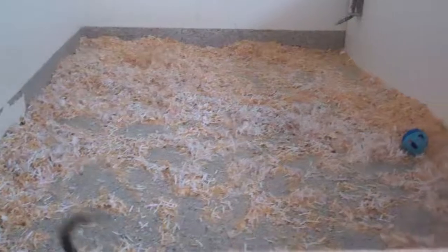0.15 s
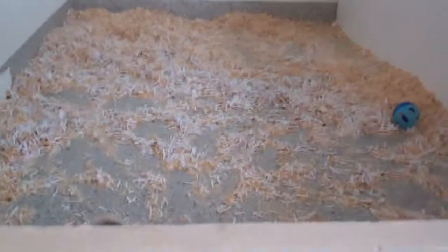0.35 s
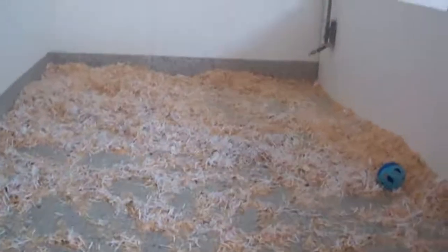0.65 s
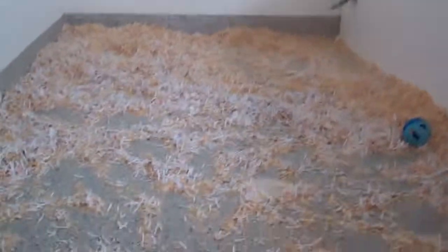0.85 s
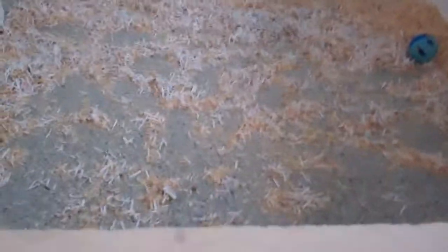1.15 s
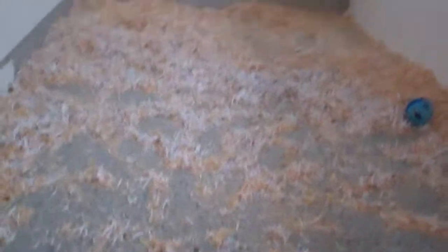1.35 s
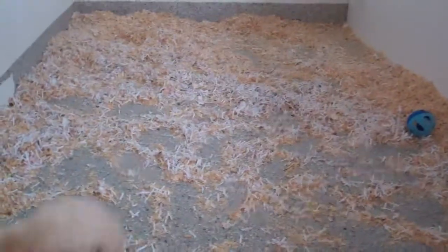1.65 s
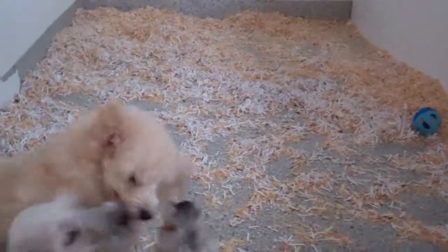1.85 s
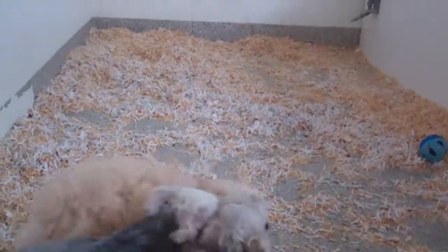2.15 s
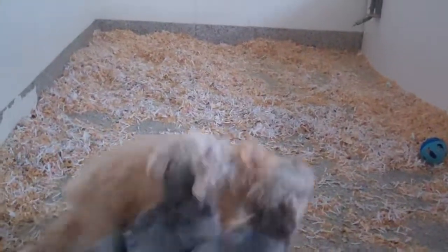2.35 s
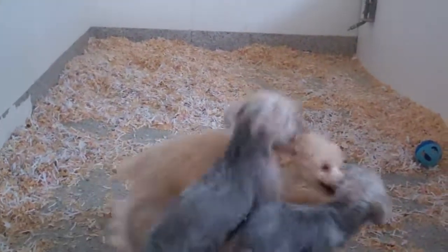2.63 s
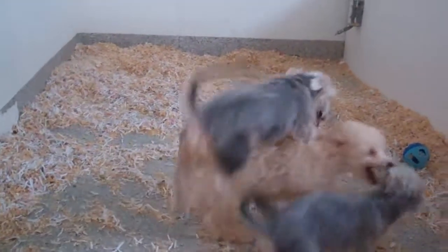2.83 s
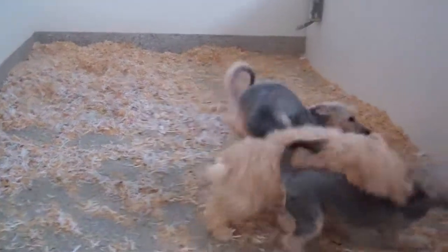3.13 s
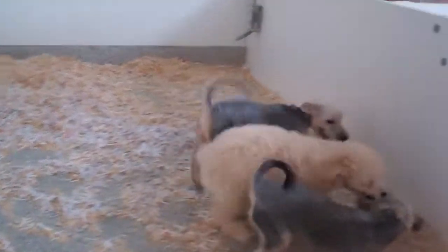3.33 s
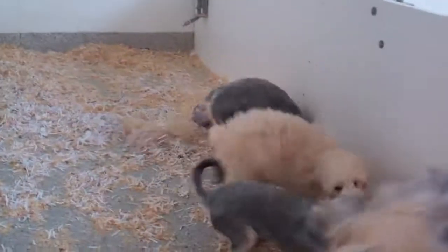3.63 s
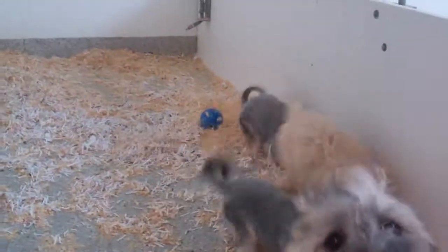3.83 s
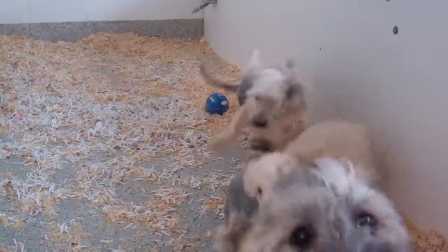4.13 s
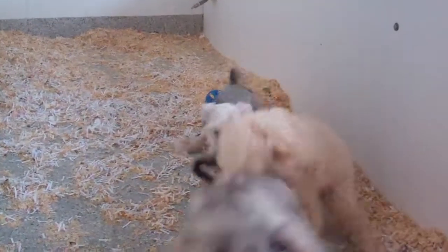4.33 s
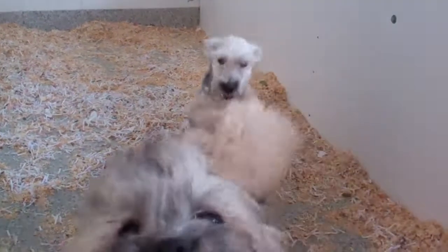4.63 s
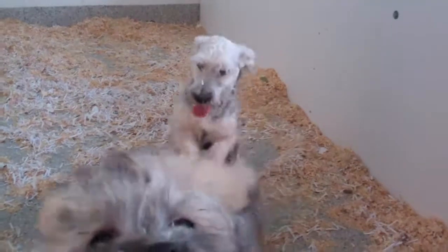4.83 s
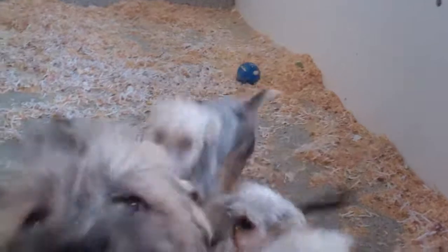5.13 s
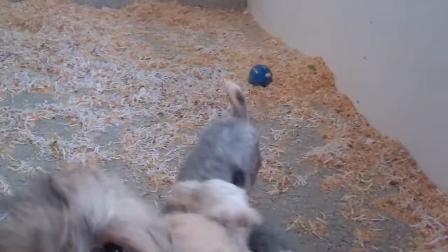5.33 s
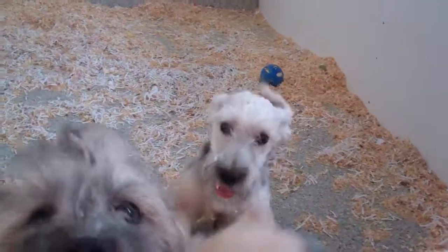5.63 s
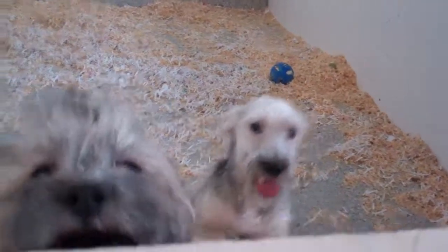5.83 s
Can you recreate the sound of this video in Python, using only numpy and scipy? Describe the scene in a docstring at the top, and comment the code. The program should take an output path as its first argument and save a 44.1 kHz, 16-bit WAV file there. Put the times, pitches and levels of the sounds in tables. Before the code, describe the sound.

In a hard-walled kennel room, puppies play-fight close to the microphone. Soft whimpers, hoarse barks and sharp yelps come first, then a thin trembling whine around two seconds sags into a yap. A piercing double yelp follows, with a bright ring. Later, regularly spaced lower gruff barks mix with small squeaks. Shredded paper rustles throughout, with claw clicks and soft paw thumps.

```python
"""A hard-walled kennel room: puppies play-fight in a pen of shredded paper and shavings, close to a camera.
They yelp, whimper and whine: gliding harmonics of the vocal folds, shaped by the mouth.
Paws and bodies stir the bedding (coloured snaps and hiss), claws scratch and a tooth clicks (ringing noise
bursts); paws land softly and two low puffs of air meet the microphone (damped low notes with noise).
Hoarse barks, and one bright ring of the room after a yelp (pulses and air through resonances), sound
from the room behind, whose echo is decaying noise with tones of its own."""
import sys
import numpy as np
from scipy import signal
from scipy.fft import rfft, irfft, next_fast_len
from scipy.io import wavfile
from scipy.ndimage import uniform_filter1d, map_coordinates

SR = 44100
rng = np.random.default_rng(int(sys.argv[2]) if len(sys.argv) > 2 else 0)


def materialize(psi):
    """Save the field psi as 16-bit PCM at rate SR to the path in sys.argv[1].

    A 1-D psi becomes a single channel; in a 2-D psi each row is a channel.
    """
    bounded = np.clip(np.atleast_2d(psi).T, -1, 1)
    quanta = np.round(bounded * 32767).astype(np.int16)
    wavfile.write(sys.argv[1], SR, quanta)


N = 263718
TIME = np.arange(N) / SR  # s
TOP_HZ = 14400  # upper band limit


def amp(db):
    """Decibels to gain."""
    return 10 ** (np.asarray(db) / 20)


def unit(x):
    """Scale to rms 1."""
    return x / np.sqrt(np.mean(x ** 2) + 1e-20)


def along(points, hz):
    """Read (Hz, value) points on a log axis."""
    f, v = np.transpose(points)
    return np.interp(np.log(hz + 1), np.log(f), v)


def curves(rows, t=TIME):
    """Each column after the first, read at times t."""
    s, *cols = np.transpose(rows)
    return [np.interp(t, s, c) for c in cols]


def wobble(rate, size):
    """A smooth random curve with rate knots a second."""
    knots = rng.standard_normal(int(size * rate / SR) + 4)
    return map_coordinates(knots, [np.arange(size) * rate / SR])


def filtered(x, response):
    """x times a response of frequency."""
    size = x.shape[-1]
    m = next_fast_len(size + 8192)
    return irfft(rfft(x, m) * response(np.fft.rfftfreq(m, 1 / SR)), m)[..., :size]


def resonances(modes, hz):
    """Response of (Hz, nominal width Hz, dB) resonances added together."""
    return sum(amp(db) / (1 + ((hz - centre) / (0.82 * width)) ** 2) for centre, width, db in modes)


def add(track, s, sound):
    """Mix a sound into a track at time s."""
    part = track[..., max(0, round(s * SR)):][..., :sound.shape[-1]]
    part += sound[..., :part.shape[-1]]


def gate(t, start, end, edge):
    """One between start and end, with soft edges."""
    return np.clip((t - start) / edge + .5, 0, 1) * np.clip((end - t) / edge + .5, 0, 1)


def diffuse(pair, spectrum):
    """Two unrelated signals become coloured left and right, alike in the bass."""
    # likeness of left and right in diffuse sound: f/Hz, correlation (0-1)
    likeness = [(100, 1), (600, 0.94), (1400, 0.64), (3000, 0.17), (8000, 0.02)]

    def mid_side(hz):
        turn = np.arccos(np.clip(along(likeness, hz), -1, 1)) / 2
        return amp(along(spectrum, hz)) * np.array([np.cos(turn), np.sin(turn)])

    mid, side = filtered(pair, mid_side)
    return unit(np.array([mid + side, mid - side]))


def folds(pitch, rough, slope_db, count):
    """Harmonics of the vocal folds, coloured by the mouth; roughness shakes their rate and strength."""
    # mouth of a yelping puppy: f/Hz, gain/dB
    mouth = [(700, -2.5), (1500, 0.5), (2700, 3), (3300, 5.5), (4150, 12.5), (5500, -0.5), (7500, -18),
             (11000, -20), (15000, -23)]
    size = len(pitch)
    pitch = pitch * (1 + 0.085 * rough * wobble(698, size))
    k = np.arange(1, count + 1)[:, None]
    gains = amp(slope_db * np.log2(k) + along(mouth, k * pitch)) * (k * pitch < TOP_HZ)
    phase = 2 * np.pi * k * np.cumsum(pitch) / SR
    tone = np.sum(gains * np.sin(phase), axis=0)
    return unit(tone * amp(7 * rough * wobble(600, size)))


def cries(table, attack_cycles, sag_db, release_s):
    """Short cries: pitch glides to a turn and a last note; the voice builds up, sags or holds, and shuts."""
    out = np.zeros(N)
    for s, length, first_hz, turn_hz, last_hz, turn, lateness, db, slope_db, rough in table:
        t = np.arange(int(length * SR)) / SR
        u, turn = t / length, np.clip(turn, .05, .95)
        to_turn = first_hz + (turn_hz - first_hz) * (u / turn) ** lateness
        to_last = turn_hz + (last_hz - turn_hz) * ((u - turn) / (1 - turn)) ** 2
        pitch = np.where(u < turn, to_turn, to_last)
        build_up = np.clip(t * first_hz / attack_cycles, 0, 1)
        shutting = np.clip((length - t) / release_s, 0, 1)
        envelope = build_up * amp(db - sag_db * u) * shutting
        add(out, s, envelope * folds(pitch, rough, slope_db, count=7))
    return out


def yelps():
    """Near yelps: the folds start within a few cycles, burst out and weaken."""
    # t/s, length/s, first f/Hz, f at the turn/Hz, last f/Hz, place of the turn (0-1, kept to .05-.95),
    # lateness of the glide to the turn (1 = even), level before the sag/dB,
    # overtone slope before the mouth/(dB/octave), roughness (0-1)
    yelp_rows = [ (1.204, 0.04, 1552, 2646, 1920, 0.87, 2.3, -9.5, -16.5, 0.08),
                 (1.526, 0.073, 2195, 2904, 2750, 0.57, 2.04, -12, -6, 0.14),
                 (1.774, 0.032, 1945, 2150, 1830, 0.31, 1.1, -20, -9, 0.17),
                 (1.812, 0.038, 1537, 1807, 1900, 0.83, 2.3, -6, -14.5, 0.042),
                 (1.846, .019, 2390, 2640, 2170, 0.49, 0.92, -8, -12, 0.074),
                 (3.395, 0.017, 2470, 2635, 2770, .5, 1.03, -6.5, -28, 0.085),
                 (3.409, .056, 2290, 2770, 2740, .76, 1.02, -6.5, -4.5, 0.11),
                 (4.004, 0.0399, 640, 778, 900, 0.51, 0.58, -10.5, -7, 0.21),
                 (4.707, 0.013, 924, 816, 735, 0.37, 1, -17, -13, 0.29),
                 (4.897, 0.038, 1398, 2136, 1580, 0.54, 0.64, -9, -11.5, 0.034),
                 (5.216, 0.013, 1650, 1400, 1170, .35, 1.2, -11.5, -20, .1),
                 (5.461, .054, 1287, 2290, 1850, .7, 0.76, -15, -15.5, 0.08), ]
    return cries(yelp_rows, attack_cycles=5.5, sag_db=3.5, release_s=0.0071)


def whimpers():
    """Whimpers from further off: the folds take many cycles to swell softly, then hold."""
    # t/s, length/s, first f/Hz, f at the turn/Hz, last f/Hz, place of the turn (0-1),
    # lateness of the glide to the turn (1 = even), level before the mix/dB,
    # overtone slope before the mouth/(dB/octave), roughness (0-1)
    whimper_rows = [ (.092, .064, 1356, 1384, 1290, .47, 1, -13, -7, 0.48),
                    (.398, 0.0438, 1200, 1376, 1350, 0.56, 1, -23, -14, 0.43),
                    (.432, 0.035, 1210, 1307, 1440, 0.495, 0.91, -10.5, -8, 0.43),
                    (.458, 0.044, 1534, 1762, 1810, 0.48, 1.02, -19.5, -7, 0.22),
                    (.506, .052, 1335, 1244, 1214, 0.34, 1, -15, -28, 0.31),
                    (.770, 0.035, 1191, 1333, 1470, 0.52, 0.95, -23.5, -11, 0.26),
                    (.795, 0.096, 807.5, 1290, 1244, 0.77, 1.8, -20.5, -3.5, 0.46),
                    (1.342, 0.058, 1220, 1522, 1260, 0.21, 1, -30, -15, 0.51),
                    (1.385, 0.07, 1103, 1074, 1160, 0.68, 2.2, -24.5, .5, 0.43),
                    (1.668, 0.046, 1288, 1346, 1520, 0.48, 1, -25.5, -11, 0.18),
                    (1.722, 0.042, 1587, 1680, 1630, .7, 1, -26.5, -13, .14),
                    (2.55, .12, 1147, 1000, 878, .3, 0.98, -26.5, -2, 0.3),
                    (2.908, .042, 1277, 1427, 1465, .55, 1.08, -23, -13, 0.33),
                    (2.925, 0.12, 795, 817.6, 824, 0.27, 1.08, -23.5, -0.5, 0.2),
                    (2.97, 0.084, 1648, 2098, 2020, 0.89, 2.06, -19.5, -16.5, 0.48),
                    (3.05, 0.032, 1345, 1420, 1445, 0.54, 1.1, -21, -25, 0.18),
                    (3.175, 0.057, 1800, 1923, 1905, 0.63, 0.92, -29.5, -22, 0.24),
                    (3.325, 0.047, 1510, 1310, 1305, 0.45, 1.06, -31.5, -22, .12), ]
    # a negative sag: the level rises slightly
    far = cries(whimper_rows, attack_cycles=17.8, sag_db=-0.5, release_s=0.011)
    # turned away, these lose their highest overtones
    return filtered(far, lambda hz: 1 / (1 + (hz / 6200) ** 10))


def whine():
    """A long thin whine: trembling harmonics with a strong third, ending as a rough yap that sags in pitch."""
    # steady voice: t/s, f before scoop and tremble/Hz, fundamental level/dB, level shared by the overtones/dB
    whine_rows = [(2.01, 1353, -24.5, -28), (2.034, 1420, -16.5, -34), (2.06, 1462, -25, -33),
                  (2.086, 1355, -20, -31), (2.19, 1410, -16, -30), (2.228, 1340, -26, -24.5),
                  (2.256, 1423, -15.5, -33), (2.378, 1357, -20.5, -28), (2.422, 1380, -29, -30),
                  (2.446, 1357, -20, -24), (2.468, 1346, -29.5, -35), (2.532, 1338, -25, -27.5),
                  (2.56, 1355, -24.5, -34)]
    # upper voice sagging into the yap: t/s, f/Hz, level/dB
    slide_rows = [(2.52, 2695, -47), (2.545, 2350, -26), (2.572, 1980, -25.5), (2.609, 1905, -30.5),
                  (2.661, 1800, -13.5), (2.692, 1860, -23)]
    pitch, first_db, overtone_db = curves(whine_rows)
    start, end = whine_rows[0][0], whine_rows[-1][0]
    # the voice slides up to its note
    scoop, scoop_s = 0.069, 0.0148  # share of the pitch, time constant
    pitch = pitch * (1 - scoop * np.exp(-np.maximum(TIME - start, 0) / scoop_s))
    tremble = 1 + 0.0063 * wobble(60, N) + 0.0063 * wobble(500, N)
    phase = 2 * np.pi * np.cumsum(pitch * tremble) / SR
    tone = amp(first_db) * np.sin(phase)
    for k, db in [(2, -9.5), (3, 7.5), (4, -11.5)]:  # harmonic, dB on the shared level
        tone += amp(overtone_db + db + 4.2 * wobble(54.93, N)) * np.sin(k * phase)
    out = np.sqrt(2) * tone * amp(3.06 * wobble(70, N)) * gate(TIME, start, end, edge=0.045)

    t = np.arange(slide_rows[0][0], slide_rows[-1][0], 1 / SR)
    slide_hz, slide_db = curves(slide_rows, t)
    yap = folds(slide_hz, rough=0.45, slope_db=-11, count=7)
    add(out, t[0], amp(slide_db) * gate(t, t[0], t[-1], edge=.003) * yap)
    return out


def crackle(rate, spread_db, hiss):
    """Two channels of tiny snaps of unequal size, rate a second, over a soft hiss."""
    struck = rng.random((2, N)) < rate / SR
    snaps = struck * rng.standard_normal((2, N)) * amp(spread_db * rng.standard_normal((2, N)))
    return unit(snaps) + hiss * rng.standard_normal((2, N))


def patchy(pair, depth_db):
    """Different strips sound at different moments: random patches of gain over time and frequency."""
    z = signal.stft(pair, nperseg=256)[2]
    field = uniform_filter1d(rng.standard_normal(z.shape[1:]), size=9, axis=0)
    field = uniform_filter1d(field, size=7, axis=1)
    return signal.istft(z * amp(depth_db * unit(field)), nperseg=256)[1][:, :N]


def stirring(moves, rise_s, settle_db_per_s, rest_db):
    """Gain of a rubbing sound: each (s, length, dB) move swells, holds and dies away over a faint unrest."""
    power = np.full(N, amp(rest_db) ** 2)
    t = np.arange(SR * 3 // 4) / SR
    for s, length, db in moves:
        swell = np.clip(t / rise_s, 0, 1)
        settling = amp(db - settle_db_per_s * np.maximum(t - length, 0))
        add(power, s, (swell * settling) ** 2)
    return np.sqrt(power)


def bedding():
    """Paper strips crackle in clumps, paws scrape under them and bodies shuffle on the floor."""
    # paws sweeping through the paper: t/s, length/s, paper level/dB, scrape level relative to the paper/dB
    strokes = [ (0.094, 0.046, -32.5, 4), (0.217, 0.046, -27.5, 2), (.265, 0.057, -24.5, 2.5),
               (0.353, 0.18, -31, 6), (0.53, 0.038, -34.5, -9), (0.774, 0.032, -28.5, 5),
               (0.92, 0.049, -32, 2.5), (1.039, 0.063, -29.5, 4), (1.147, 0.037, -23, -1),
               (1.232, 0.043, -32, 2), (1.43, 0.017, -31, 9.5), (1.464, 0.028, -23.5, -20),
               (1.567, 0.11, -39.5, 4.5), (1.692, 0.072, -30.5, 1.5), (1.808, .11, -35.5, 6),
               (2.046, 0.065, -29, 1.5), (2.18, 0.02, -33, 1), (2.327, .06, -37.5, 2),
               (2.552, 0.059, -28.5, 1), (2.768, 0.055, -31.5, -7), (2.883, 0.44, -38.5, 3.5),
               (3.232, 0.081, -27.5, 3), (3.335, 0.028, -27, 2), (3.428, 0.052, -29.5, -3),
               (3.498, .04, -32, -15), (3.7, 0.19, -39.5, 5), (3.806, 0.053, -28.5, -2),
               (3.898, 0.054, -27, 3.5), (3.96, 0.043, -29, 1.5), (4.097, 0.086, -31, 2.5),
               (4.215, 0.055, -28.5, 1.5), (4.369, 0.05, -21.5, -2.5), (4.459, 0.042, -25.5, -1),
               (4.593, 0.022, -25, -4.5), (4.692, 0.025, -23, -4), (4.786, 0.11, -33, 5.5),
               (4.856, 0.087, -24.5, -4.5), (5.051, 0.031, -35, 3), (5.193, 0.022, -23, 2.5),
               (5.246, 0.15, -35, 2), (5.46, 0.14, -31.5, -3), (5.56, 0.026, -24.5, -10),
               (5.714, 0.031, -24.5, -2), (5.767, 0.036, -23.5, -6), (5.847, 0.024, -23.5, -3.5),
               (5.91, 0.012, -41, -0.5), ]
    # bodies sliding on the floor: t/s, length/s, level/dB
    slides = [ (.105, .035, -48), (.3, .2, -41), (1.085, 0.038, -40), (1.46, 0.023, -39),
              (1.67, 0.028, -44), (2.17, 0.045, -46.5), (2.54, 0.1, -48), (2.93, 0.076, -37),
              (3.22, .06, -42.5), (3.325, 0.025, -37), (3.51, 0.092, -45), (3.67, 0.22, -39),
              (3.945, .05, -32), (4.31, 0.065, -39), (4.685, 0.1, -40.5), (4.795, 0.077, -36),
              (5.125, 0.08, -44), (5.735, 0.026, -41), ]
    # spectra of paper, scraping and floor: f/Hz, gain/dB
    paper_colour = [(2940, -31), (5000, -2), (6730, -1), (7380, -3), (12300, -1.5), (13700, -2.5),
                    (14400, -30.5)]
    scrape_colour = [(400, -22.5), (900, -5), (1500, -6.5), (2100, 0), (2800, 1), (3300, -1), (4000, 6),
                     (5000, -5), (6500, -9), (10000, -7)]
    floor_colour = [(15, -56), (25, -31), (113, -13.5), (155, -3.5), (189, -9), (223, -5.5), (522, -6),
                    (653, -7), (700, -5), (910, -5.5), (1540, -120)]

    clumps = amp(0.76 * wobble(70, N))
    paper_moves = [(s, length, db) for s, length, db, _ in strokes]
    scrape_moves = [(s, length, db + scrape_db) for s, length, db, scrape_db in strokes]
    # the paper gives way, settles and never lies quite still
    sweeping = stirring(paper_moves, rise_s=0.022, settle_db_per_s=158, rest_db=-44)
    scraping = stirring(scrape_moves, rise_s=0.023, settle_db_per_s=129, rest_db=-37)
    sliding = stirring(slides, rise_s=0.015, settle_db_per_s=188, rest_db=-53.5)

    strips = patchy(crackle(rate=1800, spread_db=1.5, hiss=.9), depth_db=1.9)
    paper = clumps * sweeping * diffuse(strips, paper_colour)
    grit = patchy(crackle(rate=1500, spread_db=0.0, hiss=1.0), depth_db=2.05)
    scrape = clumps * scraping * diffuse(grit, scrape_colour)
    rub = diffuse(rng.standard_normal((2, N)), floor_colour)
    shuffle = sliding * amp(2.2 * wobble(25, N)) * rub
    return paper + scrape + shuffle


def claws_and_tooth():
    """Each scratch or click is a quickly fading burst of noise around one broad resonance."""
    # claws catching on floor and bedding, and a tooth click at 3.395 s:
    # t/s, peak/dB, ring f/Hz, time to fade by 30 dB/s
    catches = [ (0.752, -19.5, 3940, 0.021), (1.035, -28, 4000, 0.019), (1.16, -32, 3850, 0.048),
               (1.45, -16, 4100, 0.041), (1.465, -6, 2950, 0.015), (1.73, -12.5, 3960, 0.039),
               (2.206, -16, 3980, 0.045), (3.348, -22, 8960, 0.022), (3.395, -11, 5760, 0.008),
               (4.000, -27, 9000, .02), (4.372, -15, 3800, 0.018), (4.403, -21, 10000, .04),
               (4.581, -19, 10100, 0.01), (4.678, -7.5, 10600, 0.0098), (4.827, -6, 11500, 0.013),
               (4.833, -9, 3340, 0.023), (5.181, -20, 8100, 0.017), (5.206, -10.5, 4100, 0.026),
               (5.592, -10.5, 3900, 0.058), (5.607, -15, 4000, 0.06), (5.716, -25, 7800, .02),
               (5.841, -12.5, 10900, 0.027), (5.967, -12.5, 8800, 0.039), ]
    out = np.zeros((2, N))
    t = np.arange(SR // 8) / SR
    for s, db, hz, length in catches:
        # the second noise is common to both channels
        noise = rng.standard_normal((2, len(t))) + 1.33 * rng.standard_normal(len(t))
        burst = noise * amp(-30 * t / length)
        burst = filtered(burst, lambda f: 0.019 + 1j * f * hz / (6.3 * (hz * hz - f * f) + 1j * f * hz))
        add(out, s, amp(db) * burst / np.abs(burst).max())
    return out


def paws_and_puffs():
    """Soft landings, and two low puffs of air on the microphone: a damped low note with dull noise."""
    # landings, and the puffs of air at 0.443 and 1.826 s:
    # t/s, level before the attack and decay/dB, note f/Hz
    thumps = [(0.277, -31, 294), (0.325, -26.5, 147), (0.361, -30, 230), (0.443, -45, 76),
              (1.462, -25.5, 226), (1.671, -34.5, 231), (1.826, -44, 45), (2.969, -25.5, 328),
              (3.287, -35, 220), (3.665, -28.5, 108), (3.839, -27, 334), (3.957, -34, 215),
              (3.997, -37, 290), (4.337, -23.5, 158), (4.693, -32.5, 316), (4.83, -40, 322),
              (5.224, -30.5, 398), (5.775, -28.5, 439)]
    out = np.zeros(N)
    t = np.arange(SR // 4) / SR
    attack_s, t60_s = 0.0052, 0.19
    for s, db, hz in thumps:
        dull = lambda f: f / (f + 150) / (1 + (f / (3 * hz)) ** 4)
        dull_noise = unit(filtered(rng.standard_normal(len(t)), dull))
        envelope = amp(db - 60 * t / t60_s) * (1 - np.exp(-t / attack_s))
        add(out, s, envelope * (0.83 * np.sin(2 * np.pi * hz * t) + 0.5 * dull_noise))
    return out


def barks_and_ring():
    """Ragged pulses and air in the throat; the opening mouth lifts and brightens. One row is a room ring."""
    # hoarse barks, and at 3.45 s a bright ring of the room after a yelp, made the same way:
    # t/s, length/s, f before the lift/Hz, level before the mix/dB,
    # brightness from 700 to 5500 Hz/(dB/octave), share of air (0-1, held to .7), time to open/s
    bark_rows = [ (.102, 0.0697, 854.4, -14, 8, 0.8, 0.0036), (0.453, 0.13, 870, -19.5, 0, 0.48, 0.047),
                 (0.431, 0.076, 1184, -13.5, 16, 0.6, 0.033), (0.866, 0.15, 844.7, -22, 0.5, 0.54, 0.031),
                 (1.080, 0.083, 794.5, -33, -1, 0.06, .03), (1.704, 0.095, 806, -33.5, -3.5, 0.02, 0.023),
                 (2.618, 0.043, 901.6, -19, 8.5, 0.55, 0.0074),
                 (2.959, 0.12, 828.5, -25.5, -13.5, 0.36, 0.018), (3.100, 0.086, 847, -40, -3, 0.1, 0.023),
                 (3.450, 0.13, 800, -31, 30, 0, 0.019), (4.029, 0.1655, 517.6, -20.5, -2, 0.63, .04),
                 (4.364, 0.17, 449.5, -22, -2, 0.59, 0.07), (4.855, 0.149, 472.6, -21, -5, 0.54, 0.05),
                 (5.287, 0.15, 474.7, -21, -3.5, 0.48, 0.056), (5.705, 0.18, 436.4, -22, -.5, 0.8, 0.053), ]
    # throat resonances before the lift: f/Hz, nominal width/Hz, gain/dB
    throat_modes = [(874, 187, 4), (1424, 154, 2.5), (1625, 140, 0), (2593, 290, -7), (3380, 350, -19),
                    (4700, 120, -34), (5145, 110, -21.5)]
    out = np.zeros(N)
    for s, length, pitch, db, bright_db, air, opening_s in bark_rows:
        t = np.arange(int(length * SR)) / SR
        opening = np.clip(t / opening_s, 0, 1)
        unsteady_hz = pitch * (1 + 0.0405 * wobble(44.73, len(t)))
        voiced = folds(unsteady_hz, rough=.3, slope_db=1, count=10)
        air = np.clip(air, 0, .7)
        rasp = amp(3.5 * wobble(450, len(t)))
        source = rasp * (np.sqrt(1 - air) * voiced + np.sqrt(air) * rng.standard_normal(len(t)))

        def throat(hz):
            brightness = amp(bright_db * np.log2(np.clip(hz, 700, 5500) / 1000))
            band = 1 / (1 + (hz / 5900) ** 12) / (1 + (560 / (hz + 1)) ** 4)
            return resonances(throat_modes, hz) * brightness * band

        wide = filtered(source, throat)
        shut = filtered(source, lambda hz: throat(hz) / (1 + (hz / 1100) ** 2))
        lift = .77 + .26 * opening - .05 * t / length + .015 * wobble(30, len(t))
        # reading the sound faster raises pitch and resonances together
        voice = map_coordinates(opening * wide + (1 - opening) * shut, [np.cumsum(lift)])
        closing = np.clip((length - t) / (0.37 * length), 0, 1)
        add(out, s, amp(db) * unit(voice * np.sqrt(opening) * closing))
    return out


def placed(x):
    """Direct sound reaches left and right with a drifting difference in arrival time and level."""
    # t/s, lag of the left behind the right/samples, left-right level difference/dB
    position = [(0, 3.5, -2.5), (2.2, 5, -5), (3.2, 4.5, -2), (4.2, 2.5, 0), (5, -1, 2), (6, 3.5, 2)]
    lag, tilt_db = curves(position)
    ears = []
    for side in (1, -1):
        delayed = map_coordinates(x, [np.arange(N) - side * lag / 2])
        ears.append(amp(side * tilt_db / 2) * delayed)
    return np.array(ears)


def echo(x, scale, ring):
    """Diffuse answer of hard walls, of unit energy; scale stretches the decay, ring brings out room tones."""
    # decay of the room before scale: f/Hz, t60/s
    decay = [(150, 0.89), (900, 0.68), (2500, 0.81), (5600, 0.52), (12000, 0.049)]
    # tones that hang between the walls, before ring: f/Hz, nominal width/Hz, gain/dB
    wall_tones = [(852, 57, 3.5), (1300, 57, -7), (1840, 610, -11), (2330, 330, -19), (3390, 56, -1),
                  (4240, 120, -3), (5750, 290, 7)]
    hz, t, z = signal.stft(rng.standard_normal((2, SR * 3 // 4)), SR, nperseg=256)
    fading = amp(-60 * t / (scale * along(decay, hz)[:, None]))
    tail = signal.istft(z * fading, SR, nperseg=256)[1]
    tail = filtered(tail, lambda f: 1 + ring * resonances(wall_tones, f))
    tail = diffuse(tail, [(100, 0), (10000, 0)])  # flat spectrum
    return signal.fftconvolve(x[None], tail / np.sqrt(tail.shape[1]), axes=1)[:, :N]


def scene():
    """Near cries ring briefly in the pen; the further dogs are heard directly, with a strong answer from the
    room."""
    near = yelps()
    thin = whine()
    far = whimpers()
    behind = barks_and_ring()
    pen = amp(-10.5) * echo(near, scale=0.23, ring=0)
    puppies = placed(near + thin) + pen + amp(-17) * echo(near + thin, scale=1.13, ring=2.7)
    others = amp(0.5) * placed(far) + amp(-6.5) * echo(far, scale=0.9, ring=0.47)
    background = amp(-3.0) * placed(behind) + amp(-4.5) * echo(behind, scale=0.83, ring=0.58)
    return puppies + others + background + bedding() + claws_and_tooth() + paws_and_puffs()


def record(dry):
    """The camera starts after a moment, rounds off the highest peaks and keeps nothing above its band limit."""
    start_s = .108
    held = dry / (1 + np.abs(dry) ** 8) ** (1 / 8)
    started = held * gate(TIME, start_s, np.inf, edge=0.0011)
    return filtered(started, lambda hz: hz < TOP_HZ)


dry = scene()
out = record(dry)
materialize(out)
```